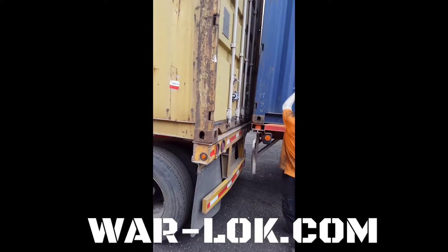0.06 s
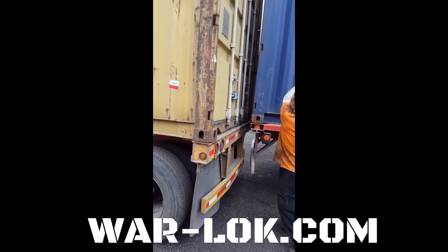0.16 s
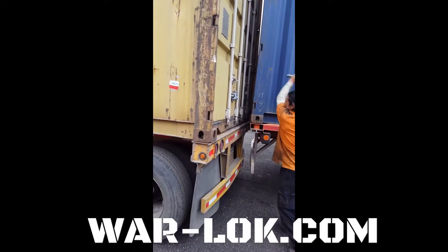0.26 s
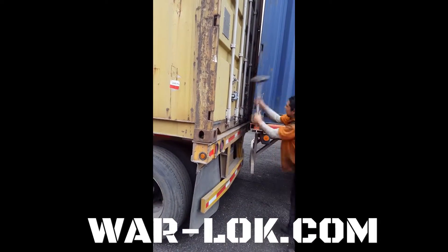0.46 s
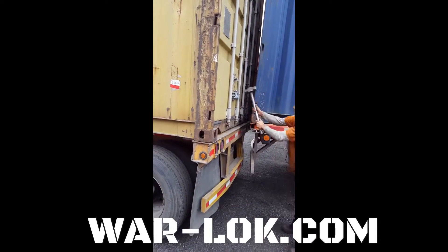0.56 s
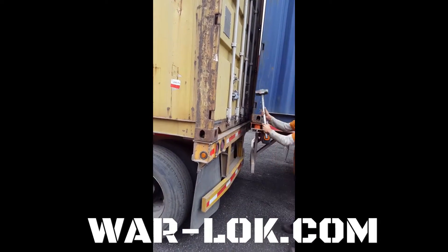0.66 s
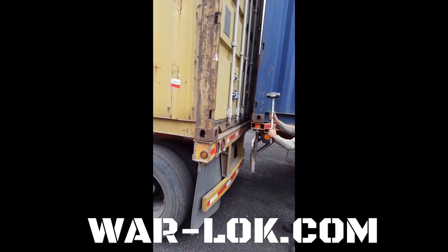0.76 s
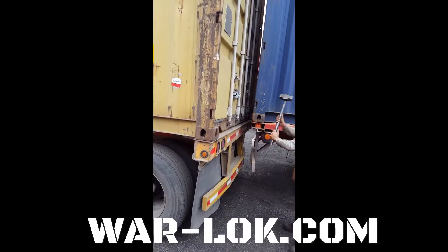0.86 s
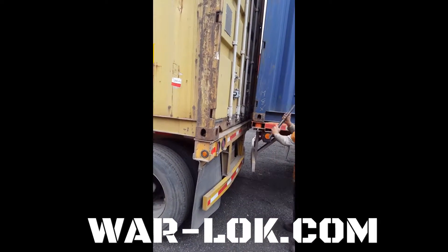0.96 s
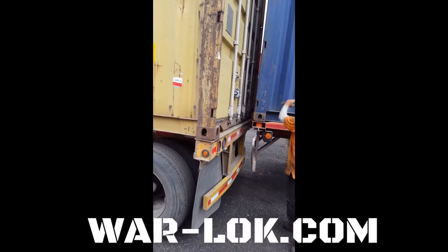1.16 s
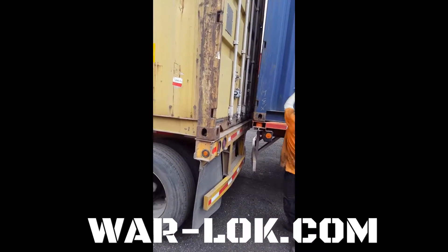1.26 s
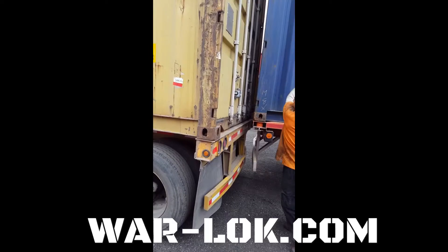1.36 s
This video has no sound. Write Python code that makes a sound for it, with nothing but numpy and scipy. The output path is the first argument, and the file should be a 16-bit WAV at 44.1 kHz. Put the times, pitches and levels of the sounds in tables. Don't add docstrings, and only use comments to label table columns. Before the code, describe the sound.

Outdoors in a container yard, low engine rumble and hum swell under light wind buffeting, with a tiny tick or two from 0.2 to 0.45 s. At about 0.6 s a heavy hammer slams a steel lock box close by: a hard, clipped crack with bright bar and hinge rattle. Door panels shudder until about 0.9 s; the hollow boom fades as rumble and faint ticks continue to about 1.4 s.

```python
import sys
import numpy as np
from scipy import signal
from scipy.fft import rfft, irfft, next_fast_len
from scipy.io import wavfile
from scipy.ndimage import map_coordinates

SR = 44100
rng = np.random.default_rng(int(sys.argv[2]) if len(sys.argv) > 2 else 0)


def transcribe(signal):
    frames = np.atleast_2d(signal).T
    limited = np.clip(frames, -1, 1)
    pcm = np.round(limited * 32767).astype(np.int16)
    wavfile.write(sys.argv[1], SR, pcm)


def amplitude_ratio(level_db):
    exponent = np.asarray(level_db, float) / 20
    return 10 ** exponent


N = 61739
BLOW_S = 0.6074

# f/Hz, level/dB, T60/s, rise/s, delay/s
BOX_MODES = [(6530, -3.5, 0.02, 0.00039, .0001), (7300, -9.5, 0.012, 0.00089, 0.000076),
             (5830, -23, 0.28, 0.00093, .001), (7300, -23.5, .3, .001, .001),
             (7790, -24.5, 0.22, .03, 0.14), (7940, -21, 0.37, 0.0078, 0.045),
             (7740, -29.5, 0.15, 0.033, .27), (12600, -33, 0.23, .001, .001),
             (13000, -33.5, .2, .001, .001)]
# f/Hz, level/dB, T60/s, rise/s, delay/s
DOOR_MODES = [(238.6, -11.5, 0.26, 0.022, 0.0061), (700, -11.5, 0.11, 0.005, 0.0013),
              (587, -11.5, 0.078, 0.0091, 0.0069), (746, -14.5, 0.6, 0.015, 0.012),
              (874, -14, .3, 0.01, 0.0072), (1066, -19.5, .8, .01, .001), (1215, -15, 0.085, .004, .001),
              (1575, -17.5, 0.17, .008, .003), (1660, -17.5, 0.14, 0.011, .006),
              (1990, -17, 0.33, .004, .001), (2325, -20.5, .2, 0.0044, .001),
              (2876, -17, 0.093, .012, 0.0032), (3010, -21.5, 0.28, .005, .001),
              (3340, -22.5, 0.16, .005, .001)]
# t/s, f/Hz, peak level/dB, length/s
PANEL_BEATS = [(.636, 454, -4, .018), (.642, 876, -18.5, 0.016), (.682, 526, -9, .016),
               (0.48, 650, -16.5, 0.024), (.675, 370, -14.5, 0.038), (0.6, 1238, -18, .012),
               (.703, 495, -11, 0.019), (.705, 1600, -17.5, 0.017), (.71, 670, -11.5, .014),
               (.732, 572, -10, 0.025), (0.66, 292, -18, 0.021), (.74, 590, -16, 0.0154),
               (.765, 529, -12.5, .022), (.775, 404, -13.5, 0.012), (.76, 990, -16.5, .018),
               (1, 1260, -27.5, .02), (.77, 222, -20, 0.018), (.795, 494, -18, 0.017),
               (.8, 1100, -16.5, 0.033), (.82, 338, -14, 0.03), (0.93, 1128, -25, 0.016),
               (.85, 483, -10, 0.014), (.853, 256, -9.5, 0.014), (0.96, 1203, -24, 0.017),
               (0.8, 400, -19, 0.016), (1, 500, -22.5, 0.034), (.95, 570, -20, 0.016), (.93, 210, -19, .02),
               (0.97, 971, -29, 0.017), (.9, 750, -25, 0.019), (.618, 400, -14, .01),
               (.655, 800, -13.5, 0.0075), (.66, 1065, -18.5, 0.013), (.66, 640, -15.5, .012),
               (.705, 540, -15, .015), (.72, 480, -13.5, 0.018), (0.6, 280, -16, .015),
               (.75, 750, -15, 0.0247), (0.95, 410, -18.5, 0.0095), (.8, 740, -18.5, 0.012),
               (.635, 2775, -18.5, .01), (.615, 1950, -18, 0.0072)]
# f/Hz, density level/dB per Hz
SHEET_COLOUR = [(90, -52), (180, -23.5), (450, -17), (700, -20), (1400, -16), (2600, -22), (5200, -26.5),
                (15800, -27)]
# f/Hz, T60/s
SHEET_DECAY = [(200, 0.99), (500, 0.79), (1200, 0.28), (3000, 0.42), (7000, 0.075), (15000, 0.033)]
# f/Hz, rise/s
SHEET_BUILD = [(200, 0.015), (500, 0.026), (1500, 0.0055), (3000, 0.0015), (12000, 0.0009)]
# f/Hz, density level/dB per Hz
SHIMMER_COLOUR = [(1500, -30), (3000, -17.5), (6000, -3), (8000, -0.5), (10500, -8.5), (13500, -7.5),
                  (15800, -4)]
# f/Hz, T60/s
SHIMMER_DECAY = [(3000, 0.37), (7000, 0.45), (10000, 0.28), (15500, .19)]
# f/Hz, density level/dB per Hz
HOLLOW_COLOUR = [(220, -17.5), (520, -9), (800, -14), (1250, -14.5), (1500, -17.5), (2500, -22.5),
                 (6000, -34), (10500, -40.5), (14000, -41.5), (16000, -52.5)]
# f/Hz, T60/s
HOLLOW_DECAY = [(250, 1.61), (500, 1.04), (1200, 1.096), (3000, 0.68), (6000, 0.73), (10000, 0.52),
                (13500, 0.55), (15500, 0.33)]
# f/Hz, correlation [-1 to 1]
STEEL_LIKENESS = [(150, 1), (300, 0.71), (640, 0.62), (1400, -0.25), (3000, -0.044), (6000, -.1),
                  (10000, -0.0078), (15000, -0.43)]
# f/Hz, width/Hz, depth level/dB
CANCELLATIONS = [(352, 44, -2.5), (535, 28, -6), (1466, 42, -8), (3140, 38, -5), (3553, 46, -9.5),
                 (3965, 59, -12.5), (5560, 60, -7), (11470, 340, -10)]
# t/s, level/dB, f/Hz, T60/s, relative width [log f]
RATTLES = [(.213, -69, 8400, .05, 0.13), (0.415, -62.5, 8950, 0.12, .15), (.445, -70, 7000, 0.096, .15),
           (.972, -60, 12800, 0.026, 0.026), (0.996, -60.5, 12900, .03, .06),
           (1.1, -68.5, 12850, 0.036, .03), (1.28, -70.5, 8200, 0.09, .2)]
# t/s, f/Hz, peak level/dB, length/s
MACHINE_SWELLS = [(0.25, 152, -25.5, 0.037), (0.24, 230, -22.5, 0.037), (0.18, 170, -32, 0.022),
                  (0.362, 400, -28, 0.052), (0.49, 176, -20, 0.032), (0.49, 262, -26, 0.11),
                  (0.44, 170, -25.5, 0.056), (0.975, 135, -22.5, 0.058), (1.219, 250, -30, 0.057),
                  (1.13, 150, -22.5, 0.02), (1.085, 1000, -36, 0.03), (0.16, 2930, -72.5, .03),
                  (0.35, 5600, -76.5, 0.065), (0.59, 1300, -69.5, 0.077), (0.42, 4900, -78, .015)]
# t/s, level/dB
YARD_LEVEL = [(0.0, -31), (0.186, -28.5), (0.346, -27), (0.654, -27), (0.8, -24), (0.95, -22.5), (1.1, -25),
              (1.246, -31.5), (1.4, -28.5)]
# f/Hz, level/dB
YARD_SPECTRUM = [(40, -50.5), (90, -15), (180, -2), (260, -4), (420, -12), (650, -13.5), (1250, -27.5),
                 (1600, -36.5), (6000, -87)]
# f/Hz, correlation [-1 to 1]
YARD_LIKENESS = [(60, 1), (250, 0.94), (600, 0.33), (1500, 0.041), (8000, .1)]
# f/Hz, width/Hz, level/dB
MACHINE_HUM = [(144, 8.3, -2), (174, 31, -2.5), (254, 10, 2), (382, 75, -1.5)]
# t/s, buffet level/dB, hiss level/dB
AIR_LEVEL = [(0, -37, -63), (.15, -37.5, -62), (.29, -31.5, -57), (.33, -36.5, -58), (.37, -31.5, -58.5),
             (.45, -25, -53.5), (.58, -29.5, -57.5), (.7, -37, -65), (.85, -36, -64), (.92, -26, -60.5),
             (1, -33, -65.5), (1.06, -25, -64), (1.1, -41, -68.5), (1.14, -30, -77.5), (1.25, -41, -63.5),
             (1.4, -33, -61.5)]
# f/Hz, density level/dB per Hz
BUFFET_COLOUR = [(15, -48.5), (30, -19.5), (55, -1), (110, -2.5), (170, -10), (300, -42.5), (600, -120)]
# f/Hz, density level/dB per Hz
HISS_COLOUR = [(800, -120), (1500, -4), (2400, -2.5), (4200, -17), (8000, -26.5), (11000, -34),
               (15500, -36)]


def along(points, hz):
    f, value = np.transpose(points)
    return np.interp(np.log(hz + 1), np.log(f + 1), value)


def wobble(rate):
    return map_coordinates(rng.standard_normal(200), [np.arange(N) * rate / SR])


def port_angle(likeness, hz):
    return np.arccos(np.clip(along(likeness, hz), -1, 1)) / 2


def pair(gain, likeness):
    size = next_fast_len(N + 8192)
    hz = np.fft.rfftfreq(size, 1 / SR)
    angle = port_angle(likeness, hz)
    noise = rfft(rng.standard_normal((2, size))) * gain(hz)
    mid, side = noise * [np.cos(angle), np.sin(angle)]
    spectra = np.array([mid + side, mid - side])
    return spectra / np.std(irfft(spectra, size)), hz, size


def coloured(gain, likeness):
    spectra, _, size = pair(gain, likeness)
    return irfft(spectra, size)[:, :N]


def fade(t60, rise, delay=0):
    t = np.maximum(np.arange(N) / SR - BLOW_S - delay, 0)
    return (1 - np.exp(-t / rise)) * amplitude_ratio(-60 * t / t60)


def blow():
    box = ring(BOX_MODES)
    shimmer = amplitude_ratio(-8.5) * dense(SHIMMER_COLOUR, SHIMMER_DECAY, [(100, 0.007)])
    sheet = amplitude_ratio(0.5) * dense(SHEET_COLOUR, SHEET_DECAY, SHEET_BUILD)
    hollow = amplitude_ratio(-3) * dense(HOLLOW_COLOUR, HOLLOW_DECAY, [(100, 0.02)])
    balance = amplitude_ratio([[1.5], [-1.5]])
    return (box + shimmer) * balance + ring(DOOR_MODES) + beats() + sheet + hollow


def ring(modes):
    beat_db, beat_hz = 5, 23
    drift_rad, drift_hz = 0.31, 59.3
    t = np.arange(N) / SR - BLOW_S
    out = np.zeros((2, N))
    for hz, db, t60, rise, delay in modes:
        apart = port_angle(STEEL_LIKENESS, hz) * np.array([[1], [-1]])
        settled = np.clip((t - delay) / 0.08, 0, 1)
        level = amplitude_ratio(db + beat_db * settled * wobble(beat_hz)) * fade(t60, rise, delay)
        drift = drift_rad * (hz / 500) ** 0.3 * wobble(drift_hz)
        out += level * np.sin(2 * np.pi * hz * t + apart + drift)
    return out


def beats():
    waver_rad = 0.29
    t = np.arange(N) / SR
    out = np.zeros((2, N))
    for s, hz, db, length in PANEL_BEATS:
        apart = port_angle(STEEL_LIKENESS, hz) * np.array([[1], [-1]])
        swell = amplitude_ratio(db) * np.exp(-((t - s) / length) ** 2)
        out += swell * np.sin(2 * np.pi * hz * t + apart + waver_rad * wobble(30))
    return out * fade(99, 0.004)


def dense(colour, decay, build):
    def gain(f):
        return amplitude_ratio(along(colour, f)) * gaps(f) * (f > 120) * (f < 16000)

    spectra, hz, size = pair(gain, STEEL_LIKENESS)
    place = 2 * np.log2(hz / 120 + 1e-9)
    out = np.zeros((2, N))
    for k in range(15):
        centre = 120 * 2 ** (k / 2)
        overlap = np.maximum(1 - abs(place - k), 0)
        band = irfft(spectra * overlap, size)[:, :N]
        out += band * fade(along(decay, centre), along(build, centre))
    return out


def gaps(hz):
    return amplitude_ratio(sum(db * np.exp(-((hz - centre) / width) ** 2) for centre, width, db in CANCELLATIONS))


def ticks():
    out = np.zeros((2, N))
    for s, db, centre, t60, width in RATTLES:
        noise = coloured(lambda f: np.exp(-(np.log(f / centre + 1e-9) / width) ** 2), [(100, 0.3)])
        t = np.arange(N) / SR - s
        attack = np.clip(t / 0.0027, 0, 1)
        out += noise * amplitude_ratio(db - 60 * np.maximum(t, 0) / t60) * attack
    return out


def swells():
    t = np.arange(N) / SR
    hums = np.zeros(N)
    for s, hz, db, length in MACHINE_SWELLS:
        swell = amplitude_ratio(db) * np.exp(-((t - s) / length) ** 2)
        hums += swell * np.sin(2 * np.pi * hz * t + 1.25 * wobble(30))
    return hums * amplitude_ratio([[0.6], [-0.6]])


def yard():
    def hum_gain(f):
        return sum(amplitude_ratio(db) * f * width / abs(centre * centre - f * f + 1j * f * width)
                   for centre, width, db in MACHINE_HUM) ** 2

    s, db = np.transpose(YARD_LEVEL)
    level_db = np.interp(np.arange(N) / SR, s, db) + 2.0
    broad = coloured(lambda f: amplitude_ratio(along(YARD_SPECTRUM, f)), YARD_LIKENESS) * amplitude_ratio(0.92 * wobble(12))
    hum = coloured(hum_gain, YARD_LIKENESS) * amplitude_ratio(-5.5 + 1.4 * wobble(12))
    return amplitude_ratio(level_db) * (broad + hum) * amplitude_ratio([[0.5], [-0.5]])


def air():
    s, low_db, hiss_db = np.transpose(AIR_LEVEL)
    t = np.arange(N) / SR
    buffet = coloured(lambda f: amplitude_ratio(along(BUFFET_COLOUR, f)), [(40, 1.0), (150, 0.9)])
    hiss = coloured(lambda f: amplitude_ratio(along(HISS_COLOUR, f)), [(1000, 0.033)])
    buffet = buffet * amplitude_ratio(np.interp(t, s, low_db) + [[0.8], [-0.8]])
    return buffet + hiss * amplitude_ratio(np.interp(t, s, hiss_db) + 1.1 * wobble(24))


def scene():
    return blow() + ticks() + swells() + yard() + air()


def low_pass(x):
    return signal.sosfilt(signal.butter(12, 15800, fs=SR, output="sos"), x)


def record(dry):
    duck_db, wait_s, fall_s, hold_s, back_s = -6, 0.028, 0.013, 0.21, 0.37
    clip_top, clip_hardness = 1.04, 4
    t = np.arange(N) / SR - BLOW_S - wait_s
    duck = np.clip(t / fall_s, 0, 1) * np.clip(1 - (t - hold_s) / back_s, 0, 1)
    x = dry * amplitude_ratio(duck_db * duck)
    x = x / (1 + abs(x / clip_top) ** clip_hardness) ** (1 / clip_hardness)
    to_edge_s = np.minimum(np.arange(N), np.arange(N)[::-1]) / SR
    mix = x * np.sin(np.pi / 2 * np.clip(to_edge_s / 0.002, 0, 1))
    return low_pass(mix)


dry = scene()
out = record(dry)
transcribe(out)
```